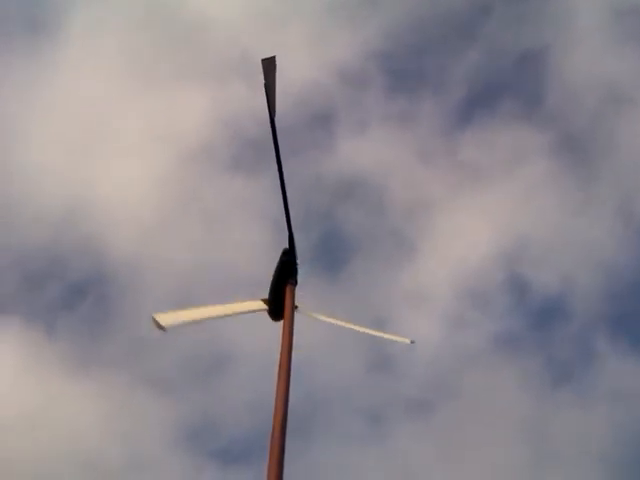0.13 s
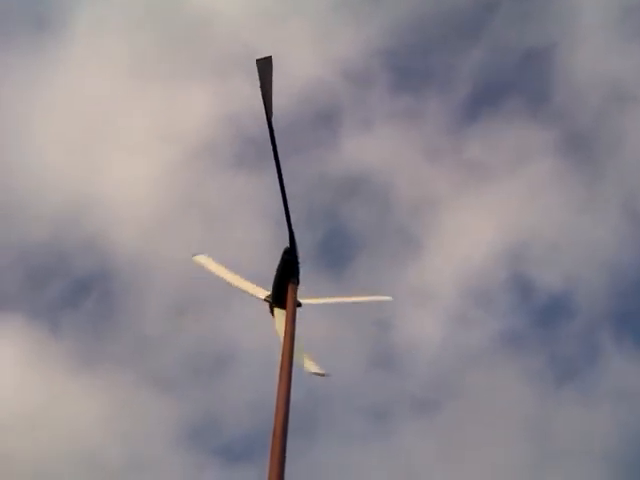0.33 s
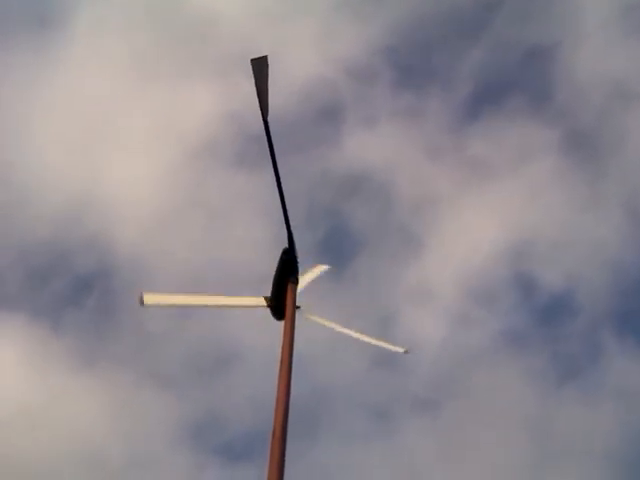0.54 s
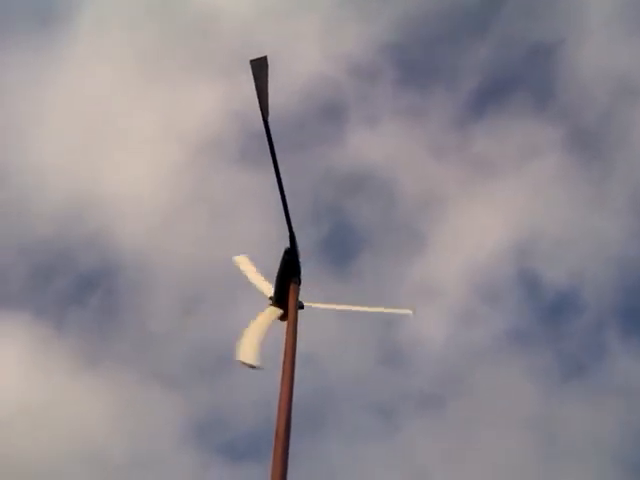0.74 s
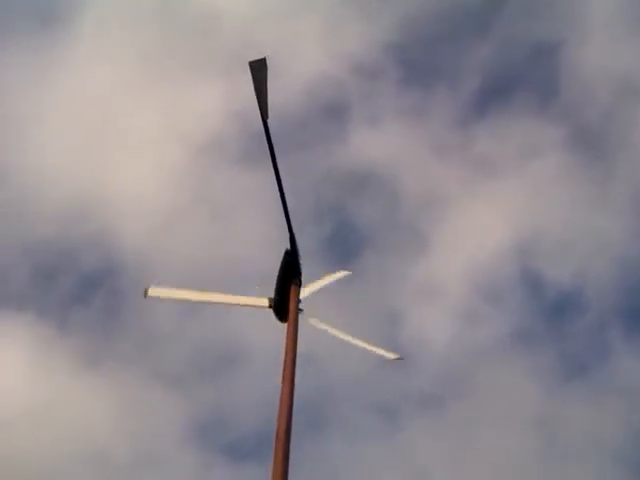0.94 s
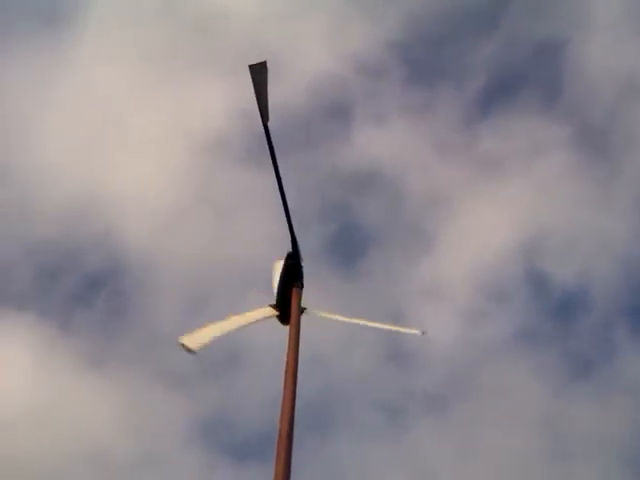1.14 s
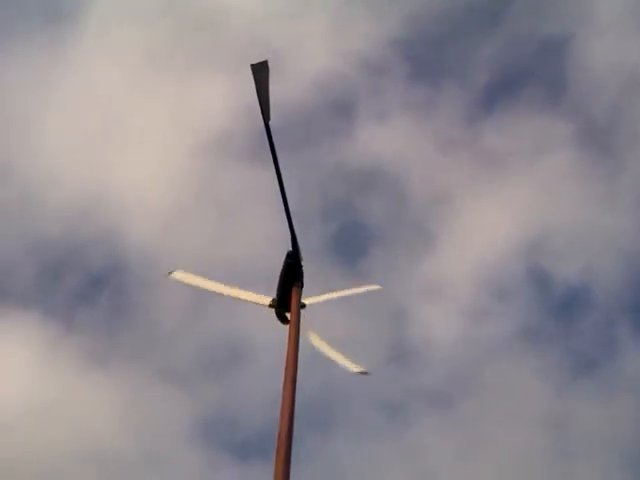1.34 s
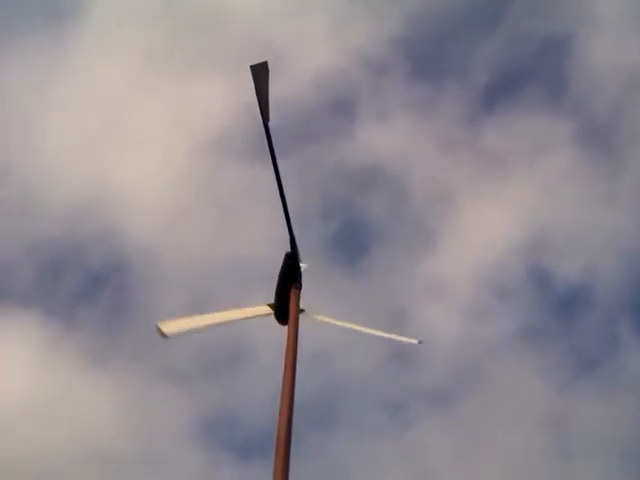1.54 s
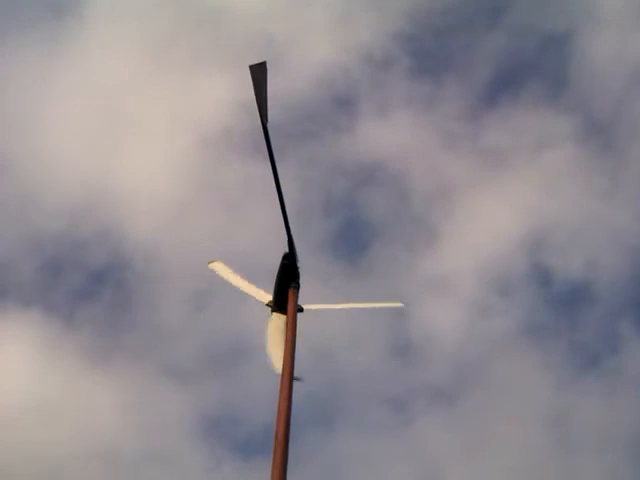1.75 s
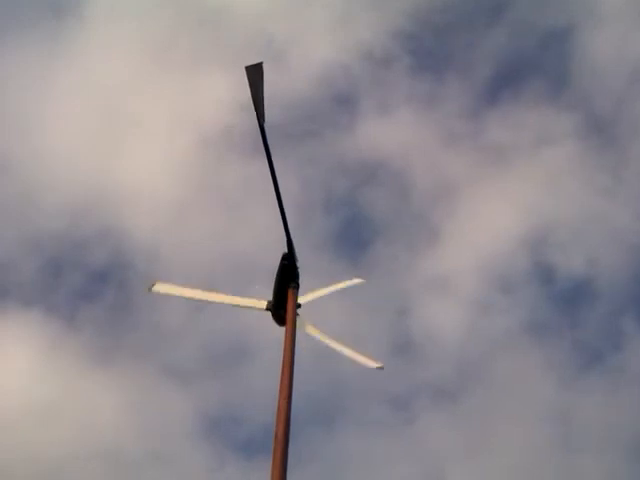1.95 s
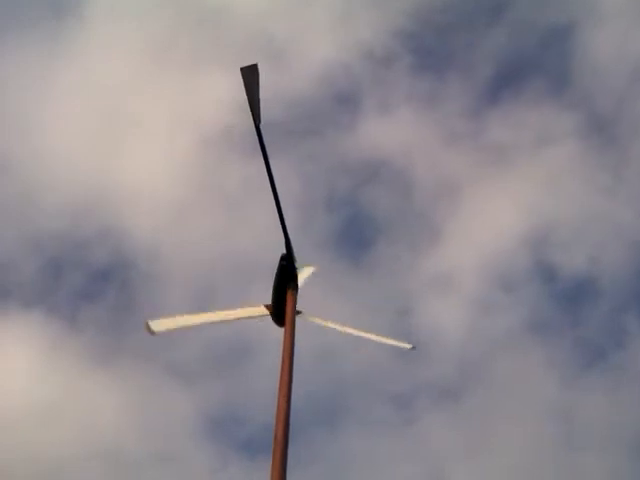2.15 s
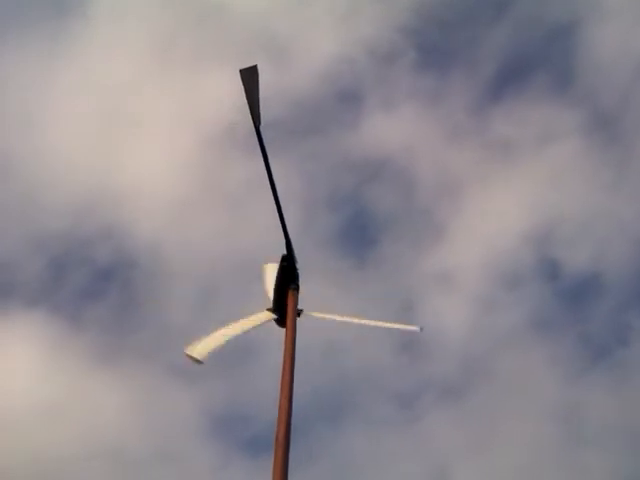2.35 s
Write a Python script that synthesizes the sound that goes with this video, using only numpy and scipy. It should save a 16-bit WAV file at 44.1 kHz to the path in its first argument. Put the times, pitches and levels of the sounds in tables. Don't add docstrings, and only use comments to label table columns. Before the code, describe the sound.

Small wind turbine whirs with a fast fluttering hiss while wind gusts thud on the microphone

```python
import sys
import numpy as np
from scipy import signal
from scipy.fft import rfft, irfft
from scipy.io import wavfile
from scipy.ndimage import uniform_filter1d

SR = 44100
rng = np.random.default_rng(int(sys.argv[2]) if len(sys.argv) > 2 else 0)


def digitize_waveform(pressure):
    field = np.atleast_2d(pressure).T
    bounded = np.clip(field, -1, 1)
    quanta = np.round(bounded * 32767).astype(np.int16)
    wavfile.write(sys.argv[1], SR, quanta)


def gain_from_db(level_db):
    decades = np.asarray(level_db, float) / 20
    return 10 ** decades


N = 110250

# time in seconds, blade passes per second, tip hiss level in dB.
ROTOR_RUN = [
    (0, 26.9, -35),
    (.4, 26.55, -35.5),
    (1.0, 26.5, -36.5),
    (1.45, 24.9, -34.5),
    (2.0, 30, -37),
    (2.199, 25.6, -37),
    (2.5, 28.5, -38.5),
]
# frequency in Hz, density in dB per Hz.
TIP_HISS_COLOUR = [(2500, -8.5), (4200, 2.5), (5810, -0.5), (6800, -18.5), (7800, -12), (8700, -17.5),
                   (9250, -24), (15500, -28)]
# frequency in Hz, density in dB per Hz.
AIR_RUSH_COLOUR = [(120, -88), (200, -17), (315, -14), (555, -4.5), (1270, -4.5), (2680, -8.5),
                   (3000, -41.5), (3900, -32), (6600, -120)]
# frequency in Hz, density in dB per Hz.
RUMBLE_COLOUR = [(15, -26), (28, -8), (42, -7.5), (65, -1.5), (92, -1.5), (150, -5), (300, -15),
                 (600, -32.5)]
# time in seconds, level in dB.
BREEZE_LEVEL = [(0.0, -39), (0.3, -39), (0.44, -41), (0.55, -43), (0.66, -23), (0.81, -42), (1.06, -41),
                (1.18, -37.5), (1.42, -34), (1.59, -38.5), (1.68, -40), (1.82, -36), (2.05, -40.5),
                (2.23, -39.5), (2.5, -43.5)]
# centre in seconds, length in seconds, level in dB, eddy pitch in Hz.
WIND_PUFFS = [(0.236, .018, -25.5, 280.3), (0.294, 0.016, -33.5, 170.8), (0.355, 0.03, -17, 300.5),
              (0.402, 0.024, -26, 258.6), (0.421, 0.013, -18.5, 260.9), (0.447, 0.011, -22, 281),
              (0.479, 0.044, -31.5, 199.2), (0.526, 0.028, -30, 198.7), (0.589, 0.041, -17.5, 259.3),
              (0.649, 0.037, -16.5, 219.5), (0.694, 0.01542, -16, 325.1), (0.725, .02, -25, 200.8),
              (0.764, 0.022, -20, 308.6), (0.87, 0.0638, -18.5, 298.9), (0.923, .024, -14.5, 200.3),
              (.973, 0.052, -15.5, 321.9), (1.031, 0.046, -16, 320.4), (1.086, 0.035, -20, 223.8),
              (1.151, 0.048, -22.5, 247.4), (1.204, 0.018, -22, 257.5), (1.452, 0.023, -27.5, 188.7),
              (1.577, 0.055, -24, 228.8), (1.616, 0.017, -14.5, 302.9), (1.702, 0.039, -23.5, 242),
              (1.791, .016, -33, 237.5), (1.857, 0.033, -22, 237.9), (2.024, 0.014, -24.5, 356.9),
              (2.063, 0.026, -24, 216.7), (2.141, 0.035, -27, 200.4), (2.218, 0.027, -31.5, 205.3)]
# time in seconds, peak level in dB, pitch in Hz.
SHARP_EDDIES = [(.236, -15, 314), (.351, -11, 410), (.361, -8.5, 332), (.399, -17.5, 420),
                (.423, -9.5, 318), (.443, -15, 396), (.602, -15, 650), (.646, -7.5, 300),
                (.664, -14.5, 520), (.695, -7.5, 410), (.761, -15.5, 420), (.857, -11.5, 331.6),
                (.919, -7, 308), (.958, -6, 620), (.996, -6.5, 399.6), (1.007, -7, 421.5),
                (1.024, -10, 350), (1.043, -4, 424), (1.065, -10, 399.3), (1.207, -15, 349.9),
                (1.619, -6, 375.2), (1.841, -14.5, 479.3), (1.876, -17, 478.8), (2.02, -11.5, 480.7),
                (2.063, -18.5, 257.3), (2.133, -18.5, 280.6)]

BLADE_START_TURNS, THROB_DB, ODD_BLADE_DB = 0.29, 2, 0.5
AIR_DB, AIR_THROB_DB = -37.5, 0.5
RUMBLE_DB, RUMBLE_SMEAR_S, BREEZE_DB = -4.5, 0.043, -1.5
PUFF_EDGE_POWER = 2.4
EDDY_DB, EDDY_CYCLES, EDDIES_PER_CYCLE = -0.5, 0.6, 1.05
PITCH_SPREAD_NEPER, SIZE_SPREAD_DB = 0.29, 2.18
SMALL_EDDY_DB, SMALL_EDDY_PITCH_RATIO, SMALL_EDDIES_PER_CYCLE = -12, 2.2, 0.45
SNAP_DB, SNAP_CYCLES, SNAP_DUCK = 0.24, 0.51, 0.8
HEADROOM = 0.8


def unit(x):
    return x / np.sqrt(np.mean(x ** 2))


def walk(rate_hz):
    hold = int(SR / rate_hz)
    steps = np.repeat(rng.standard_normal(400), hold)[:N]
    return 1.55 * uniform_filter1d(uniform_filter1d(steps, hold), hold)


def rush(shape, swell_db, flicker_db, flicker_hz):
    hz, db = np.array(shape, float).T
    corner = np.log2(hz)
    octave = np.log2(np.maximum(np.fft.rfftfreq(N, 1 / SR), 1))
    gain = gain_from_db(np.interp(octave, corner, db, left=-120, right=-120))
    spectrum = rfft(rng.standard_normal(N)) * gain
    swell = swell_db * walk(2.88)
    out = 0
    for centre in np.arange(4, 14.5, 0.5):
        if corner[0] - 0.5 < centre < corner[-1] + 0.5:
            band = np.cos(np.pi * np.clip(octave - centre, -0.5, 0.5)) ** 2
            out = out + irfft(spectrum * band, N) * gain_from_db(swell + flicker_db * walk(flicker_hz))
    return unit(out)


def turbine(t):
    s, passes_hz, hiss_db = np.array(ROTOR_RUN).T
    phase = 2 * np.pi * (BLADE_START_TURNS + np.cumsum(np.interp(t, s, passes_hz)) / SR)
    throb_db = THROB_DB * np.cos(phase) + ODD_BLADE_DB * np.cos(phase / 3 - 1.2)
    hiss = rush(TIP_HISS_COLOUR, 0.14, 0.95, 13.86) * gain_from_db(np.interp(t, s, hiss_db) + throb_db)
    air = rush(AIR_RUSH_COLOUR, 1.0, 0.73, 9.38) * gain_from_db(AIR_DB + AIR_THROB_DB * np.cos(phase))
    return hiss + air


def rumble(t, force):
    push = uniform_filter1d(force ** 2, int(RUMBLE_SMEAR_S * SR)) * gain_from_db(2 * RUMBLE_DB)
    breeze = gain_from_db(2 * (np.interp(t, *np.array(BREEZE_LEVEL).T) + BREEZE_DB))
    return rush(RUMBLE_COLOUR, 0.18, 2.4, 13) * np.sqrt(np.maximum(push, 0) + breeze)


def puffs(t):
    s, length_s, db, hz = np.array(WIND_PUFFS).T[:, :, None]
    coarse_t = t[::32]
    swell = np.exp(-np.abs(2 * (coarse_t - s) / length_s) ** PUFF_EDGE_POWER)
    power = gain_from_db(2 * db) * swell + 1e-12
    total = power.sum(0)
    force = np.interp(t, coarse_t, np.sqrt(total))
    pitch_hz = np.interp(t, coarse_t, (power * hz).sum(0) / total)
    return force, pitch_hz


def dip(turns, cycles):
    balance = np.exp(-(np.pi * cycles) ** 2)
    return (balance - np.cos(2 * np.pi * turns)) * np.exp(-(turns / cycles) ** 2)


def eddies(force, hz, per_cycle):
    count = np.cumsum(hz) * per_cycle / SR
    chance = rng.standard_normal((4000, 3))[:int(count[-1])]
    due = np.arange(len(chance)) + 0.5 + 0.25 * chance[:, 0]
    at = np.searchsorted(count, due).clip(0, N - 1)
    pitch_hz = hz[at] * np.exp(PITCH_SPREAD_NEPER * chance[:, 1].clip(-2, 2))
    size = force[at] * gain_from_db(SIZE_SPREAD_DB * chance[:, 2])
    lag = np.arange(-450, 450)
    tugs = size[:, None] * dip(pitch_hz[:, None] * lag / SR, EDDY_CYCLES)
    pad = len(lag)
    out = np.bincount((at[:, None] + lag + pad).ravel(), tugs.ravel(), N + 2 * pad)
    overlap = np.sqrt(EDDY_CYCLES * per_cycle / 1.64)
    return gain_from_db(EDDY_DB) * out[pad:pad + N] / overlap


def snaps(t):
    s, db, hz = np.array(SHARP_EDDIES).T[:, :, None]
    turns = np.clip(hz * (t - s), -4, 4)
    room = np.prod(1 - SNAP_DUCK * np.exp(-(turns / 0.95) ** 2), axis=0)
    flicks = (gain_from_db(db + SNAP_DB) * dip(turns, SNAP_CYCLES)).sum(0)
    return flicks, room


def buffeting(t):
    force, pitch_hz = puffs(t)
    low = rumble(t, force)
    thuds = eddies(force, pitch_hz, EDDIES_PER_CYCLE)
    small_force = force * np.minimum(force / 0.13, 1.5)
    small = eddies(small_force, SMALL_EDDY_PITCH_RATIO * pitch_hz, SMALL_EDDIES_PER_CYCLE)
    flicks, room = snaps(t)
    return room * (thuds + gain_from_db(SMALL_EDDY_DB) * small) + flicks + low


def scene():
    t = np.arange(N) / SR
    return (turbine(t) + buffeting(t))[None]


def low_pass(x):
    return signal.sosfilt(signal.butter(12, 15620, fs=SR, output="sos"), x)


def record(dry):
    mix = HEADROOM * np.tanh(dry[0] / HEADROOM)
    return low_pass(mix)


dry = scene()
out = record(dry)
digitize_waveform(out)
```